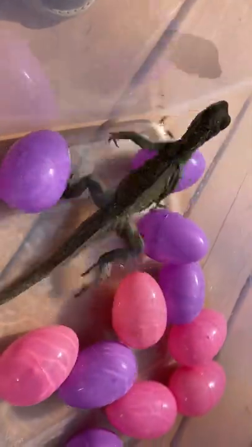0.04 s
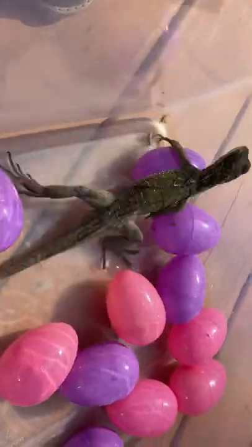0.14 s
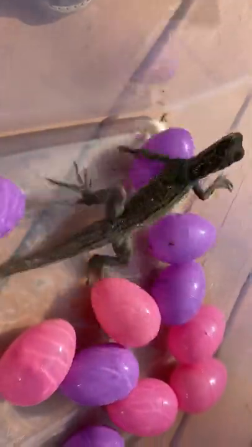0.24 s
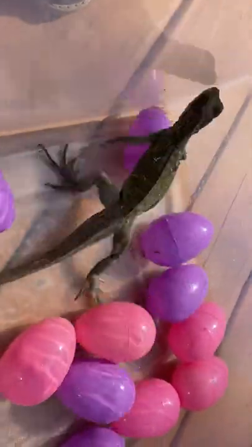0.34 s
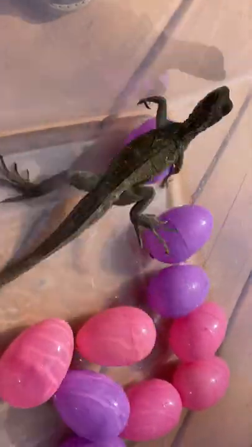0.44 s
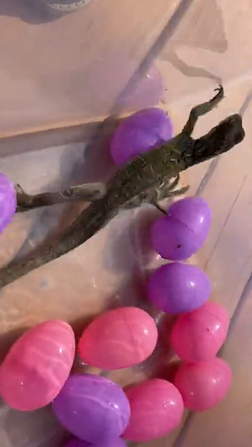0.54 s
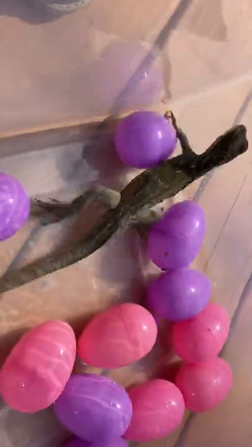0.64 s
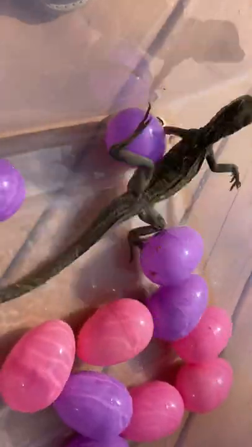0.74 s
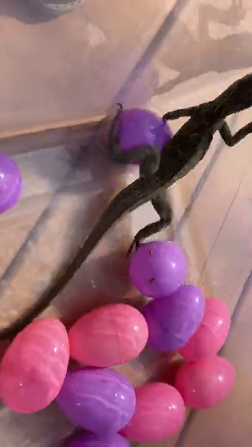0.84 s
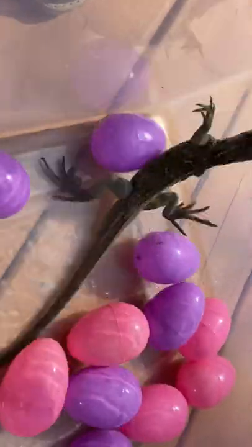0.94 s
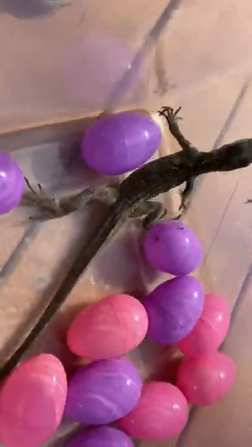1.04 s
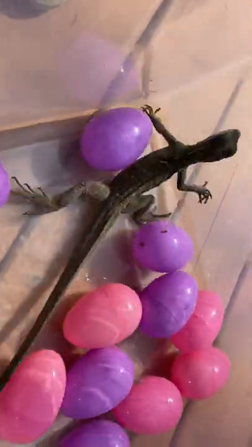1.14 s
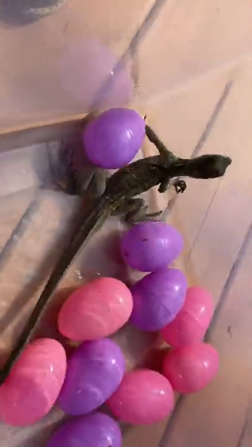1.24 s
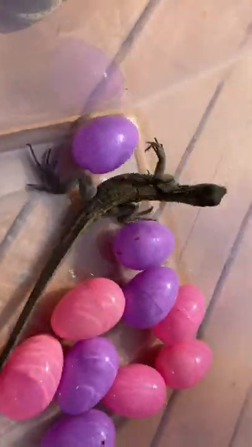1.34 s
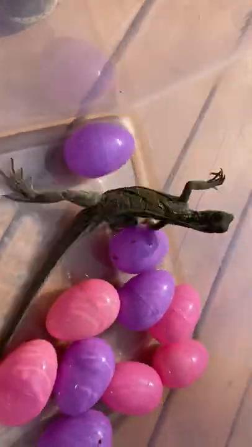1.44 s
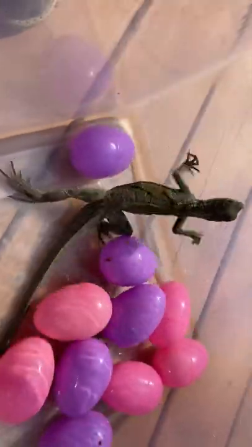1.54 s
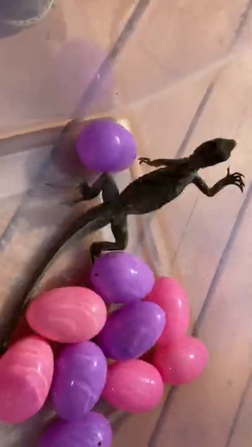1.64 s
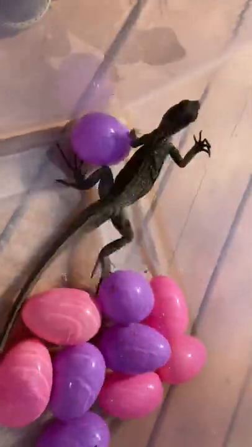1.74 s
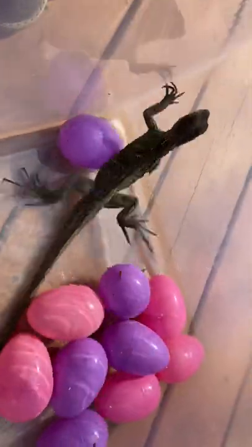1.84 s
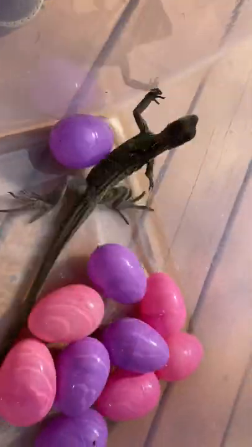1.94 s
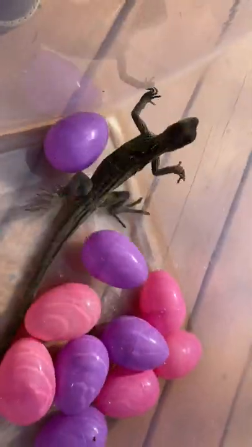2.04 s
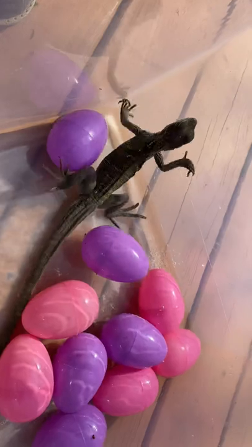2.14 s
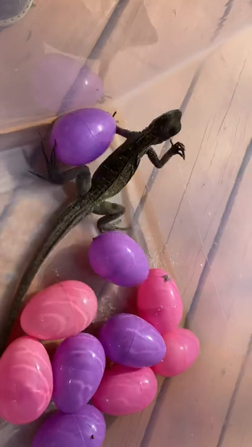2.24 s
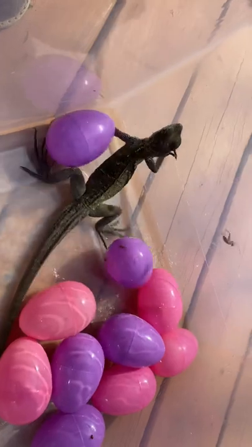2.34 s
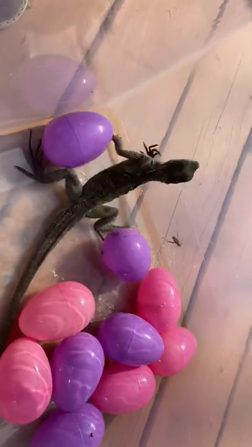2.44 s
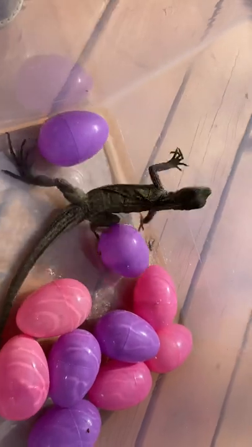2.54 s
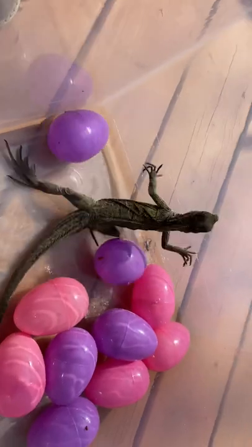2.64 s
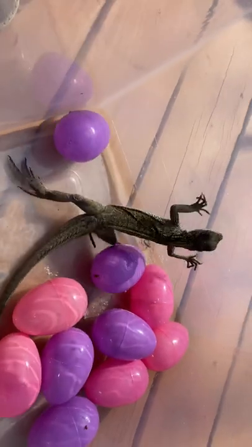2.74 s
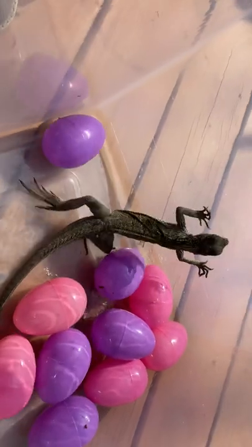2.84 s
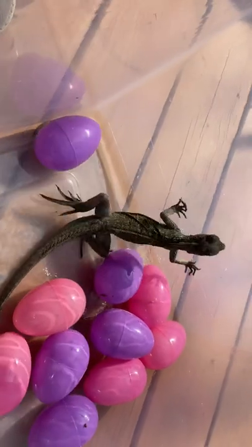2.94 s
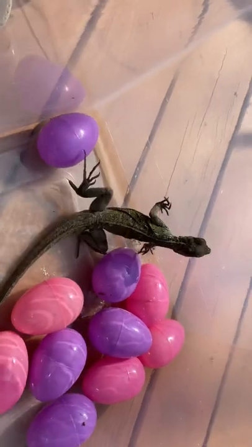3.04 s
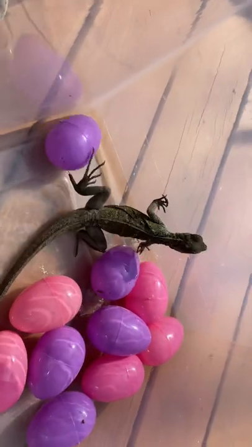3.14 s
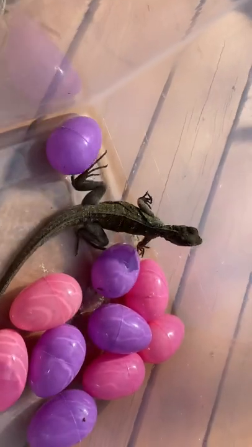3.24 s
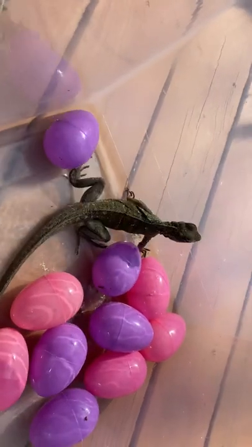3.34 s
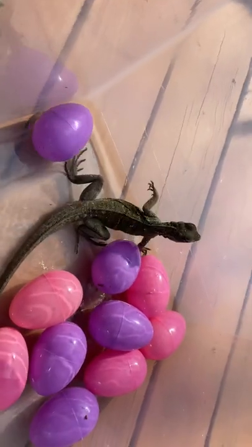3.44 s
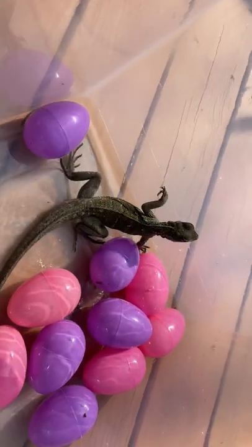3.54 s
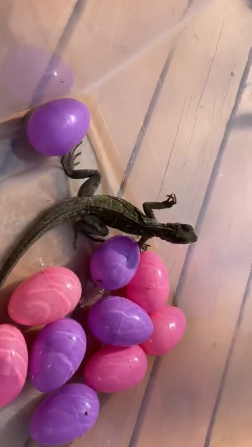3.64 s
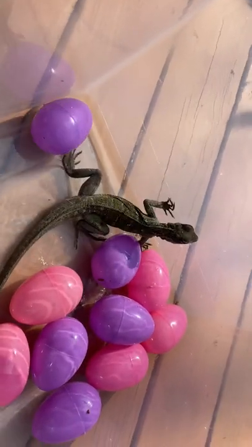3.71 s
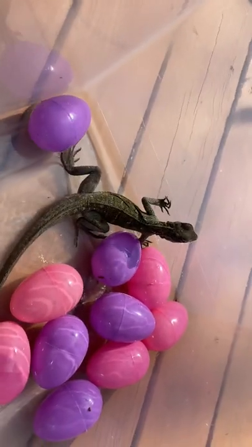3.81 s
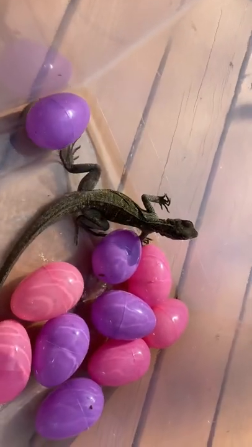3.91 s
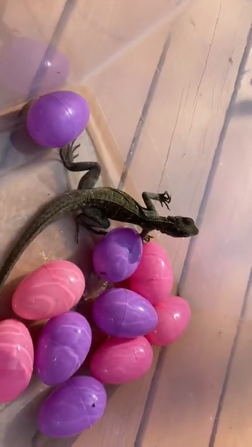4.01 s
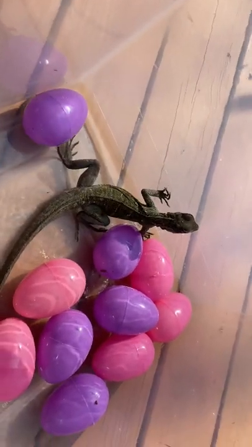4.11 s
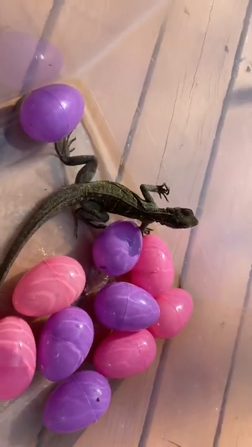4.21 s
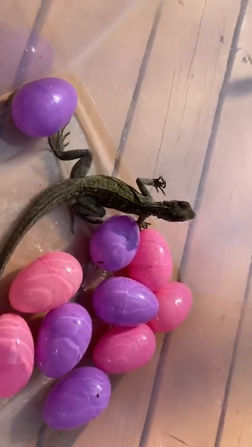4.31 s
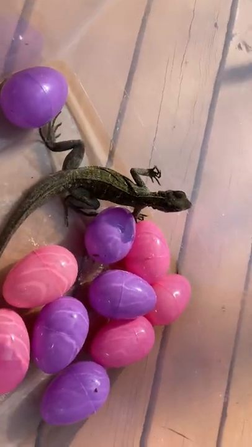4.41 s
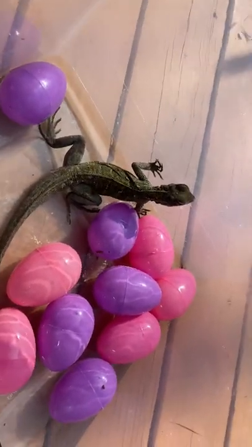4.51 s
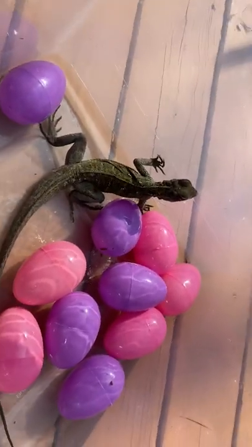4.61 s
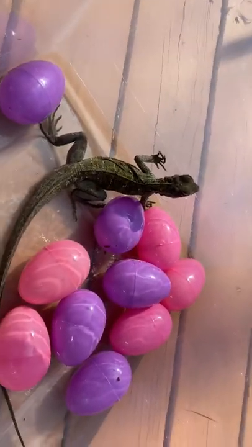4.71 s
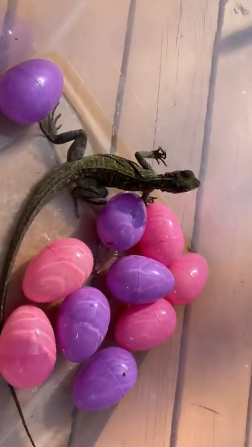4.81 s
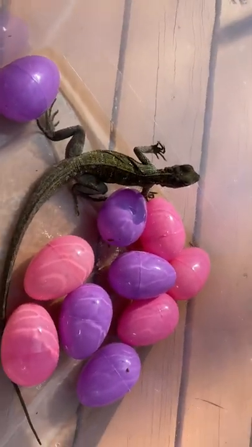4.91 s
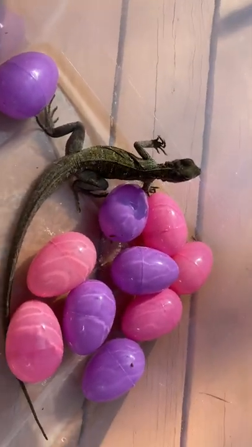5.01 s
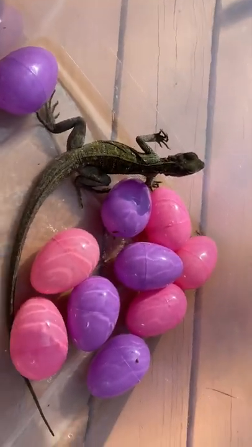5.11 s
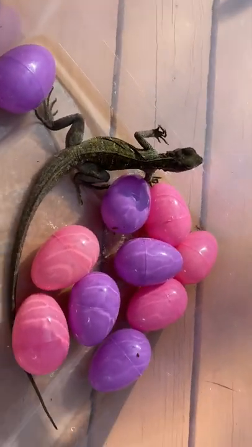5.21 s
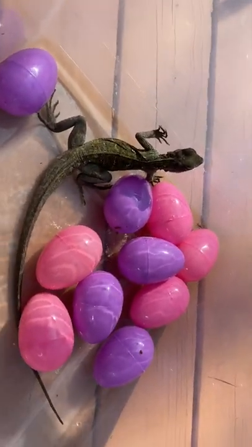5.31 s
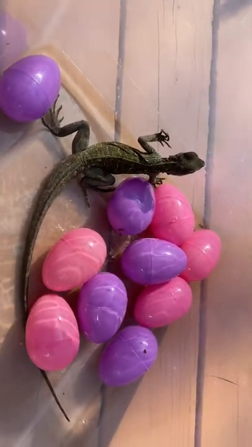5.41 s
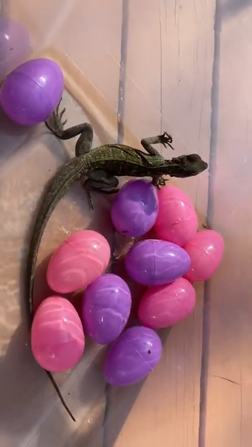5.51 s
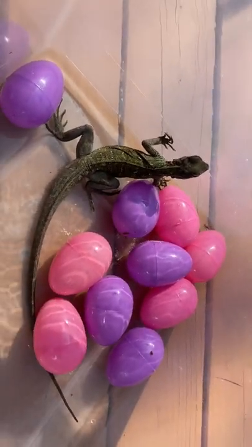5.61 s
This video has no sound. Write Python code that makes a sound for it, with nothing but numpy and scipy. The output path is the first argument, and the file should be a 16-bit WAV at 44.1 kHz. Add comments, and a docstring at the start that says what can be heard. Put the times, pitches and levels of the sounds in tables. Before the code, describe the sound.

A lizard's claws scrabble, tick and bump loudly over hollow plastic outdoors, then die away as birds whistle and trill.

```python
"""Lizard in a plastic tub

A lizard scrabbles among hollow plastic eggs, outdoors, close to a two-port microphone, and the scramble dies away.
Claw ticks and scrapes are shaped noise plus tub modes; foot and egg bumps are booming modes and noise knocks.
Birds, as gliding tones with echoes, peep faintly and sing falling whistles and a trill over soft air,
hollow blips of band noise and a quiet wavering hum.
"""
import sys
import numpy as np
from scipy import signal
from scipy.fft import rfft, irfft, next_fast_len
from scipy.io import wavfile
from scipy.ndimage import uniform_filter1d

SR = 44100
rng = np.random.default_rng(int(sys.argv[2]) if len(sys.argv) > 2 else 0)


def transcribe(u):
    """Save the signal u as a 16-bit wav file named by the first command-line argument.

    u: samples, shape (n,) or (channels, n), limited to [-1, 1]; the rate is SR.
    q: integer samples, one column per channel.
    """
    v = np.clip(np.atleast_2d(u).T, -1, 1)
    q = np.round(v * 32767).astype(np.int16)
    wavfile.write(sys.argv[1], SR, q)


N = 249586
TIME_S = np.arange(N) / SR


def amp(db):
    """Amplitude factor of a level in dB."""
    return 10 ** (np.asarray(db) / 20)


def unit(x):
    """Scale to unit rms."""
    return x / np.sqrt(np.mean(x ** 2) + 1e-20)


def curve(rows, x, column=1):
    """One table column, joined by straight lines."""
    rows = np.asarray(rows)
    return np.interp(x, rows[:, 0], rows[:, column])


def spectrum(points, hz):
    """Gain of a (Hz, dB) table on a log-frequency axis."""
    point_hz, db = np.transpose(points)
    return amp(np.interp(np.log(hz + 1), np.log(point_hz), db))


def add(mix, start_s, sound):
    """Mix a sound in place, cut at the end."""
    part = mix[..., max(round(start_s * SR), 0):][..., :sound.shape[-1]]
    part += sound[..., :part.shape[-1]]


def convolve(x, taps):
    """Convolve along time, cut to the scene length."""
    return signal.oaconvolve(x, taps, axes=1)[:, :N]


def band(x, lo_hz, hi_hz, order=2):
    """Butterworth bandpass."""
    edges_hz = [lo_hz, min(hi_hz, .49 * SR)]
    return signal.sosfilt(signal.butter(order, edges_hz, "band", fs=SR, output="sos"), x)


def colour(x, points, size=1024):
    """Minimum-phase filter with the given (Hz, dB) spectrum."""
    log_gain = np.log(spectrum(points, abs(np.fft.fftfreq(size, 1 / SR))))
    response = np.exp(np.conj(signal.hilbert(log_gain)))
    taps = np.fft.ifft(response).real[:size // 2]
    return signal.oaconvolve(x, taps[None], axes=1)[:, :x.shape[1]]


def strength(x, size):
    """Highest short-time rms, over size samples."""
    return np.sqrt(uniform_filter1d((x ** 2).mean(0), size).max())


# outdoor air spectrum: (frequency [Hz], relative density [dB/Hz])
AIR_COLOUR = [(25, -21.5), (60, -2), (120, -8), (200, -12), (280, -28.5), (800, -31.5), (1500, -33.5),
              (5000, -39), (11000, -44.5), (16000, -51.5)]
# background level over time, dipping from about 4 s to 4.6 s: (time [s], level re AIR_DB [dB])
AIR_LEVEL_DB = [(3.7, 9), (4.1, 2), (4.6, -1), (5.0, 6.5)]
AIR_DB = -62
# hum: (time [s], level [dB])
HUM_DB = [(3.3, -49.5), (3.9, -55.5), (4.3, -68), (5.2, -68.5), (5.5, -55)]


def background():
    """Coloured noise for outdoor air; a low hum whose pitch wavers at random."""
    air = unit(colour(rng.standard_normal((2, N)), AIR_COLOUR, size=8192))
    air = air * amp(AIR_DB + curve(AIR_LEVEL_DB, TIME_S))
    drift = unit(band(rng.standard_normal(N), 0.77, 26))
    hum_hz = 145 + 6.7 * drift
    hum = np.sqrt(2) * np.sin(2 * np.pi * np.cumsum(hum_hz) / SR)
    return air + hum * amp(curve(HUM_DB, TIME_S))


# faint hollow blips: (time [s], peak level [dB], pitch [Hz])
HOLLOW_BLIPS = [(4.328, -56, 534), (4.631, -58, 610), (4.815, -59, 536), (4.875, -57.5, 527),
                (5.093, -46.5, 600), (5.17, -58, 520), (5.295, -60, 504), (5.472, -63.5, 470),
                (5.625, -55.5, 475)]


def blips(decay_s=0.009):
    """Short, soft, hollow tones: narrow-band noise that swells and dies away."""
    out, t = np.zeros((2, N)), np.arange(SR // 6) / SR
    for start_s, db, hz in HOLLOW_BLIPS:
        noise = band(rng.standard_normal((2, len(t))), hz * .9, hz * 1.126)
        puff = noise * t * np.exp(-t / decay_s)
        add(out, start_s, amp(db) * puff / strength(puff, size=256))
    return out


def echoes(x, t60_s, gap_s):
    """Sparse reflections that die away exponentially, different at each port."""
    t = np.arange(SR) / SR
    signs = rng.choice([-1, 1], (2, SR))
    present = rng.random((2, SR)) < 2000 / SR  # 2000 per s
    taps = signs * present * (t > gap_s) * np.exp(-np.log(1000) * t / t60_s)
    return convolve(x, taps / np.linalg.norm(taps[0]))


def whistle(t, hz, gain, waver=0.015, overtone=0):
    """A nearly pure gliding tone with a slight random waver."""
    wander = unit(uniform_filter1d(rng.standard_normal(SR), size=60))[:len(t)]
    phase = 2 * np.pi * np.cumsum(hz * (1 + waver * wander)) / SR
    tone = np.sin(phase) + overtone * np.sin(2 * phase)
    return np.sqrt(2) * tone * gain * signal.windows.tukey(len(t), .12)


# trill strokes: (time from syllable peak [s], pitch before sag [Hz], level re trill [dB])
LOW_TRILL_STROKE = [(-.036, 2850, -17), (-.022, 2665, -12.5), (-.011, 2850, -20.5)]
HIGH_TRILL_STROKE = [(-.017, 3040, -9), (-.011, 3317, -2), (-.006, 3510, 3), (-.002, 3690, 1.5),
                     (.004, 3597, -13.5)]
TRILL_START_S, TRILL_STEP_S = 4.033, .0499
TRILL_DB, TRILL_FADE_DB = -47, -5.5  # dry; most of the fade falls on the last syllables
TRILL_SAG = 0.023  # fraction of pitch, first to last syllable


def trill(count=11):
    """Each syllable is a soft low stroke overlapped by a loud, mostly rising one; the pitch sags along the trill."""
    song = np.zeros((1, N))
    for k in range(count):
        along = k / (count - 1)
        for stroke in (LOW_TRILL_STROKE, HIGH_TRILL_STROKE):
            t = np.arange(stroke[0][0], stroke[-1][0], 1 / SR)
            hz = curve(stroke, t) * (1 + TRILL_SAG * (.5 - along))
            db = TRILL_DB + TRILL_FADE_DB * along ** 4 + curve(stroke, t, column=2)
            start_s = TRILL_START_S + k * TRILL_STEP_S + t[0]
            add(song, start_s, whistle(t, hz, amp(db), waver=0.0097))
    return song


# gliding notes: (time [s], length [s], first pitch [Hz], last pitch [Hz], dry level [dB])
GLIDE_NOTES = [(2.073, 0.029, 2790, 2920, -58.5), (2.38, 0.033, 2725, 2890, -57.5),
               (2.69, 0.023, 2810, 2970, -57), (3.238, 0.005, 3300, 4530, -50),
               (3.277, 0.086, 5690, 3450, -47.5), (3.881, 0.072, 7060, 5240, -51),
               (3.948, 0.014, 5180, 3240, -52), (3.962, 0.022, 3643, 3874, -44)]
NOTE_ARCH, NOTE_SKEW = 0.3, 2.7  # exponents; the skewed arch peaks late
# a second bird's low, level whistles: (time [s], length [s], first pitch [Hz], last pitch [Hz], dry level [dB])
LEVEL_WHISTLES = [(3.53, 0.09, 2060, 2090, -58.5), (3.595, 0.135, 2070, 2050, -52.5),
                  (3.603, 0.055, 1955, 1910, -57), (3.821, 0.081, 1800, 1930, -59)]
WALL_S, WALL_DB = .0087, -6.5  # one clear reflection


def birds():
    """Gliding notes, a fast trill and low whistles, direct and by way of nearby surfaces and the yard."""
    song, low = trill(), np.zeros((1, N))
    for start_s, length_s, first_hz, last_hz, db in GLIDE_NOTES:
        t = np.arange(0, length_s, 1 / SR)
        hz = first_hz + (last_hz - first_hz) * t / length_s
        arch = abs(np.sin(np.pi * (t / length_s) ** NOTE_SKEW)) ** NOTE_ARCH
        add(song, start_s, whistle(t, hz, amp(db) * arch, overtone=0.034))
    for start_s, length_s, first_hz, last_hz, db in LEVEL_WHISTLES:
        t = np.arange(0, length_s, 1 / SR)
        hz = first_hz + (last_hz - first_hz) * t / length_s
        arch = np.sin(np.pi * t / length_s) ** .5
        add(low, start_s, whistle(t, hz, amp(db) * arch))
    near = amp(3.5) * song + amp(7) * echoes(song, .07, 0)
    add(near, WALL_S, amp(WALL_DB) * near)
    nearby = amp(-3.0) * echoes(song, 0.22, 0.0065)
    yard = amp(-4.0) * echoes(song + amp(-7) * low, 1.0, 0.045)
    return near + nearby + low + yard


# tub modes: (nominal frequency [Hz], mean level [dB], t60 [s])
TUB_MODES = [(58, -14.5, 0.27), (120.5, -14.5, 0.11), (148.4, -7.5, 0.14), (187.5, -5.5, 0.1),
             (236, 3.5, 0.081), (268.8, -1, 0.13), (409, -15.5, 0.031), (464, -5.5, 0.01),
             (564, -13, 0.045), (891.3, -18, 0.12), (1202, -15.5, 0.059), (1980, -23, 0.075),
             (2380, -19, 0.041), (3640, -15, 0.03), (4380, -17, 0.057)]


def tub_ring(t, spread_db=4.5, detune=0.022):
    """Decaying tub modes; their shares and pitches change with the place that is struck."""
    hz, db, t60_s = np.transpose(TUB_MODES)[:, :, None]
    share, shift = rng.standard_normal((2, len(TUB_MODES), 1))
    phase = 2 * np.pi * rng.random((2, len(TUB_MODES), 1))
    decay = amp(db + spread_db * share) * np.exp(-np.log(1000) * t / t60_s)
    return (decay * np.sin(2 * np.pi * hz * (1 + detune * shift) * t + phase)).sum(1)


def bend(x, lag_s, at_hz=230):
    """Bending waves in thin plastic: treble arrives first, bass later; lag_s is the delay at at_hz."""
    size = 2 * x.shape[1]
    hz = np.fft.rfftfreq(size, 1 / SR)
    dispersion = np.exp(-4j * np.pi * lag_s * np.sqrt(hz * at_hz))
    return irfft(rfft(x, size) * dispersion)[:, :x.shape[1]]


def spot_colour(spread_db, count=72):
    """Random spectrum: each spot on the tub or egg shell favours its own few resonances."""
    return np.transpose([np.geomspace(500, SR / 2, count), spread_db * rng.standard_normal(count)])


def claw_tick(t, snap_s=0.0033, rattle_s=0.014, rattle_db=-12, ring_db=-8):
    """A hard snap, its duller scatter between the walls, and the tub's upper modes."""
    snap, scatter = rng.standard_normal((2, 2, len(t))) * (1 - np.exp(-t / .0008))
    scatter = band(scatter * np.exp(-t / rattle_s), 210, 4820, order=1)
    ring = band(tub_ring(t), 980, 6500)
    tick = snap * np.exp(-t / snap_s) + amp(rattle_db) * scatter + amp(ring_db) * ring
    return colour(tick, spot_colour(4.8))


def slips(per_s, spread_db):
    """Random stick-slip impulses, a few much larger than the rest."""
    present = rng.random(N) < per_s / SR
    size = amp(spread_db * np.minimum(rng.exponential(1, N), 3.5))
    return present * size * rng.choice([-1, 1], N)


# scrape spectrum: (frequency [Hz], relative gain [dB])
SCRAPE_GAIN = [(150, -11), (450, 6), (750, 5), (1200, -2), (2200, -6.5), (5000, -11), (10000, -13.5),
               (15500, -17.5)]
# how hard the lizard struggles: (time [s], effort [dB])
STRUGGLE = [(0.0, -37.5), (0.21, -43), (0.65, -38), (0.86, -37), (1.03, -45), (1.35, -46.5), (1.8, -40),
            (1.98, -47), (2.11, -56.5), (2.41, -53), (2.6, -50.5), (2.88, -56.5), (3.13, -61.5),
            (3.66, -65), (3.99, -80.5), (4.2, -86)]
BUSY_DB, SLIP_THINNING = -37.5, 0.35  # below this effort, slips are sparser
SCRAPE_DB, RUMBLE_DB, RUMBLE_PER_EFFORT = 8.5, 11, 0.94  # [dB, dB, dB/dB]


def sliding(count=14):
    """Claws and scales catch in scuffs, denser and louder with effort; shifting weight makes the floor rumble."""
    t, scrape, rumble = np.arange(SR // 5) / SR, 0, 0
    effort_db = curve(STRUGGLE, TIME_S)
    busy = np.clip(amp(SLIP_THINNING * (effort_db - BUSY_DB)), .1, 1)
    for _ in range(count):
        scuff = amp(5 * np.tanh(unit(band(rng.standard_normal(N), 2, 20))))
        catch = claw_tick(t, snap_s=.0014, rattle_db=-13, ring_db=-13)
        catches = slips(40 * busy, 6.5) * scuff / np.sqrt(busy)
        scrape = scrape + convolve(catches[None], catch)
        rumble = rumble + convolve(slips(15, 2)[None], tub_ring(t, detune=.07))
    floor_gain = [(25, -3.0), (55, -2.0), (100, 5.0), (260, -2.0), (500, -11.5), (3000, -37.5)]
    rumble = unit(colour(rumble, floor_gain, size=4096)) * amp(RUMBLE_DB + RUMBLE_PER_EFFORT * effort_db)
    scrape = unit(colour(scrape, SCRAPE_GAIN)) * amp(SCRAPE_DB + effort_db)
    settling = amp(np.interp(TIME_S, [3.7, 4.2], [0, -9]))
    return settling * (scrape + rumble)


# claws dragged over the plastic: (time [s], length [s], level [dB])
CLAW_DRAGS = [(0.0, 0.032, -24.5), (0.273, 0.048, -28), (0.548, 0.061, -26), (0.621, 0.14, -29.5),
              (0.793, 0.1, -28), (1.185, 0.073, -38.5), (1.52, 0.051, -36), (1.642, 0.071, -34.5),
              (2.162, 0.077, -43.5), (2.526, 0.097, -36), (2.732, 0.013, -40), (2.986, 0.074, -45.5),
              (3.416, 0.028, -48), (3.586, 0.11, -56.5)]
DRAG_SLIPS_PER_S = 90  # per claw


def drags(count=3):
    """Dragged claws stick and slip in quick, uneven runs, each ringing its own spot."""
    out, t = np.zeros((2, N)), np.arange(SR // 10) / SR
    for start_s, length_s, db in CLAW_DRAGS:
        size, rub = round(length_s * SR), 0
        for _ in range(count):
            present = rng.random(SR) < DRAG_SLIPS_PER_S / SR
            run = (present * amp(rng.uniform(-20, 0, SR)))[:size]
            catch = claw_tick(t, snap_s=0.0011, rattle_db=-15, ring_db=-15)
            rub = rub + signal.oaconvolve(run[None], catch, axes=1)
        rub = colour(colour(rub, SCRAPE_GAIN), [(700, -1), (2200, 3), (9000, -1.5)])
        rms = np.sqrt((rub ** 2).mean(0).sum() / size + 1e-20)
        add(out, start_s, amp(db) * rub / rms)
    return out


# feet and eggs on the tub: (time [s], boom level re BOOM_DB [dB], centre [Hz],
#   knock level re boom level and KNOCK_DB [dB])
FLOOR_BUMPS = [(0.022, -8, 256, -30), (0.09, -14.5, 230, -14), (0.131, -6, 200, -13),
               (0.251, -16, 243, -2.5), (0.306, -14, 260, -26), (0.506, -11, 270, -11),
               (0.539, -10.5, 280, -14), (0.571, -11.5, 215, -23), (0.667, -15, 264, -12.5),
               (0.721, -13.5, 272.7, -7), (0.824, -18, 232, -6.5), (0.938, -7.5, 214, -4),
               (0.981, -8.5, 203, -8.5), (1.2, -18, 206, -5.5), (1.266, -27, 277, -2.5),
               (1.509, -11.5, 240, -6.5), (1.682, -14, 282, -20), (1.786, -6, 215, -3.5),
               (1.85, -22, 254, -10), (1.966, -19, 264, -9), (2.265, -20, 165, -18), (2.31, -12, 285, -16),
               (2.492, -10.5, 147, -25), (2.552, -8.5, 215, -11), (2.672, -11, 270, -9.5),
               (2.78, -15, 215, -13.5), (2.838, -17.5, 228, -18), (3.007, -25.5, 197, -11.5),
               (3.028, -28, 320, -5), (3.079, -25, 223, -20), (3.212, -29.5, 140, -45),
               (3.456, -24.5, 236, -40), (3.501, -29, 244, -15.5), (3.665, -33.5, 231, -18),
               (3.857, -37, 239.5, -27), (3.916, -39, 153.7, -42)]
BOOM_DB, KNOCK_DB = -5, 1.5
USUAL_BOOM_HZ, FLEX_DB_PER_OCT = 240, 3  # a deeper bump flexes the whole floor more


def bumps(push_db=42, rattle_s=0.0089, shell_db=-7):
    """A push bends the floor, which booms around its centre; egg shells knock with a hollow and a hard note."""
    out, t = np.zeros((2, N)), np.arange(SR // 5) / SR
    for start_s, db, hz, knock_db in FLOOR_BUMPS:
        blow = amp(push_db) * (t == 0) + tub_ring(t, spread_db=4.5, detune=0.032)
        flex_db = FLEX_DB_PER_OCT * np.log2(USUAL_BOOM_HZ / hz)
        boom_gain = [(30, -20), (hz / 3, flex_db - 5), (hz, 0), (hz * 2, -9), (900, -26), (2500, -48)]
        boom = bend(colour(blow, boom_gain), lag_s=0.00427)
        rattle = rng.standard_normal((2, len(t))) * np.exp(-t / rattle_s)
        knock = band(rattle, 360, 610) + amp(shell_db) * band(rattle, 900, 1200)
        knock = bend(knock, lag_s=.0015)
        add(out, start_s, amp(db + BOOM_DB) * boom / strength(boom, size=256))
        add(out, start_s, amp(db + knock_db + KNOCK_DB) * knock / strength(knock, size=256))
    return out


# claw strikes: (time [s], peak level re CLAW_DB [dB], treble share [dB], struck spot's ring [Hz])
CLAW_STRIKES = [(0.0607, -16, -6.5, 2000), (0.09, -3, -11, 1870), (0.126, -6.5, -24.5, 1480),
                (0.133, -11.5, -24.5, 1900), (0.24, -9.5, -3, 5160), (0.2514, -12.5, -22.5, 1730),
                (0.303, -19, -13.5, 2750), (0.371, -14.5, -21, 2470), (0.4556, -13.5, -25.5, 4500),
                (0.4718, -25.5, -26, 1360), (0.496, -13.5, -14.5, 2230), (0.504, -13, -26.5, 1780),
                (0.5262, -18.5, -13.5, 1700), (0.5398, -6, -14, 1712), (0.554, -18, -20, 2920),
                (0.5716, -12.5, -19.5, 2550), (0.6234, -11.5, -15, 2430), (0.647, -16, -19, 2510),
                (0.707, -14.5, -20.5, 1540), (0.7498, -5, -5, 1980), (0.7891, -10, -18, 2500),
                (0.876, -9, -11.5, 2040), (0.9366, -7.5, -22.5, 1920), (0.9811, -11.5, -9.5, 2030),
                (1.0095, -15.5, -22, 1460), (1.1954, -20, -18.5, 2160), (1.304, -32, -32, 1700),
                (1.333, -27, -2.5, 4200), (1.364, -28.5, -33.5, 1980), (1.4611, -20, -16, 1970),
                (1.5097, -20, -15, 1900), (1.614, -10.5, -12, 2730), (1.6307, -12, -11, 2130),
                (1.6698, -12, 5, 1950), (1.678, -19.5, -19.5, 2180), (1.6923, -16, -20.5, 2270),
                (1.7281, -20.5, 6.5, 2050), (1.785, -21.5, -16.5, 2080), (1.8516, -18, -22, 2010),
                (1.8863, -19.5, -11.5, 1630), (1.9674, -21, -21.5, 2080), (2.039, -36, -26.5, 1690),
                (2.0775, -35.5, -11, 2470), (2.126, -34, -9, 3750), (2.304, -25, -13, 2000),
                (2.49, -35.5, -47, 1500), (2.5516, -48, -7, 2410), (2.5792, -28, -32, 1330),
                (2.6735, -28, -20, 1510), (2.779, -32, -30, 1900), (2.792, -33, -15, 3000),
                (2.926, -39, -15, 1990), (2.9674, -25, -8.5, 3540), (3.078, -41.5, -24.5, 2000),
                (3.164, -44, 9, 3484), (3.429, -32.5, -12, 1830), (3.455, -34, -14, 1825),
                (3.7096, -34.5, -9, 2131), (4.5709, -56, -28.5, 3590), (4.603, -53.5, -45.5, 1210),
                (5.0962, -48.5, -9, 3070)]
# strike spectrum: (frequency [Hz], relative gain [dB])
STRIKE_GAIN = [(150, -22.5), (500, 7), (2000, -6), (3000, -8.5), (5000, -5.5), (10000, -9), (13500, -11),
               (16000, -27)]
CLAW_DB, USUAL_TREBLE_DB, HARDNESS = -7.5, -12.5, 1  # more treble than usual = harder strike


def claws(spot_db=7, rebound_db=-11):
    """A claw skids, catches and rebounds; hardness tilts the treble and the struck spot adds its ring."""
    out, t, lead = np.zeros((2, N)), np.arange(SR // 10) / SR, SR // 40
    for start_s, db, treble_db, hz in CLAW_STRIKES:
        roughness = unit(uniform_filter1d(rng.standard_normal(lead), size=40))
        grain = rng.standard_normal((2, lead)) * amp(4 * roughness)
        skid = amp(-21) * grain * np.exp(-t[:lead][::-1] / .004)  # grows into the catch
        catch = claw_tick(t)
        rebound = amp(rebound_db) * band(claw_tick(t), 300, 6000)
        add(catch, rng.uniform(.004, .009), rebound)
        tick = bend(colour(np.hstack([skid, catch]), STRIKE_GAIN), lag_s=.0012)
        tick = colour(tick, [(hz / 3.4, 0), (hz, spot_db), (hz * 2.0, 0)])
        tick = colour(tick, [(3000, 0.012), (9500, HARDNESS * (treble_db - USUAL_TREBLE_DB))])
        peak = strength(band(tick, 2000, 17000), size=64)
        add(out, start_s - lead / SR, amp(db + CLAW_DB) * tick / peak)
    return out


# microphone ports: (frequency [Hz], likeness [0-1], left phase lead [rad])
PORT_PAIR = [(100, .995, -.1), (250, .96, -.5), (420, .85, -1.4), (700, .8, -3), (1200, .55, -3.3),
             (2000, .45, -4.7), (4000, .55, -4.9), (5800, .6, -4.5), (7300, .97, -3.14), (13500, .96, 3.14),
             (15600, .93, 5.9)]
# port balance: (frequency [Hz], left minus right [dB])
PORT_BALANCE = [(50, 2.5), (150, -3.5), (380, -2.5), (700, 0)]


def ports(x):
    """Blend two versions of a sound into what two ports pick up, by likeness, phase and balance per frequency."""
    size = next_fast_len(N + SR // 10)
    hz = np.fft.rfftfreq(size, 1 / SR)
    a, b = rfft(x, size)
    same, lead = curve(PORT_PAIR, hz), curve(PORT_PAIR, hz, column=2)
    lean = np.sqrt(spectrum(PORT_BALANCE, hz))
    left = (same * a + np.sqrt(1 - same ** 2) * b) * np.exp(1j * lead)
    return irfft(np.array([left * lean, a / lean]), size)[:, :N]


def scene():
    """Tub sounds with faint reflections, blips, background and birds, picked up by the two ports."""
    tub = claws() + drags() + bumps() + sliding()
    reflections = amp(-23.5) * echoes(band(tub, 67, 6000, order=1), 0.12, 0.02)
    return ports(tub + reflections + blips() + background() + birds())


EDGE_HZ = 15900


def record(dry):
    """Overload clips the peaks; a linear-phase lowpass sets the band edge."""
    taps = signal.firwin(255, EDGE_HZ, window=("kaiser", 9), fs=SR)
    return signal.oaconvolve(np.clip(dry, -.86, .86), taps[None], "same")


dry = scene()
out = record(dry)
transcribe(out)
```